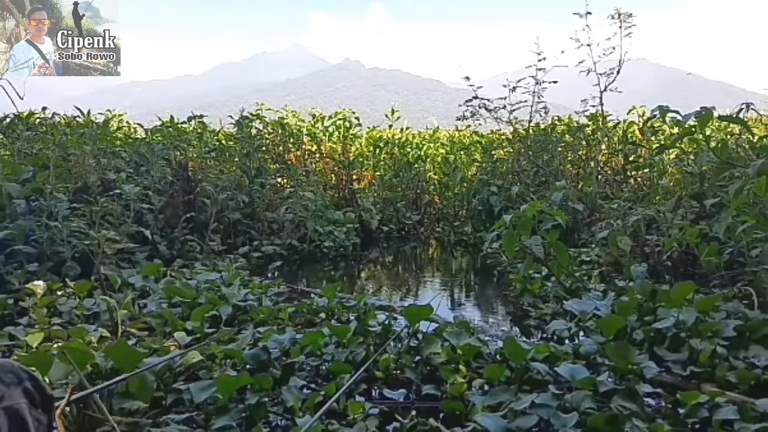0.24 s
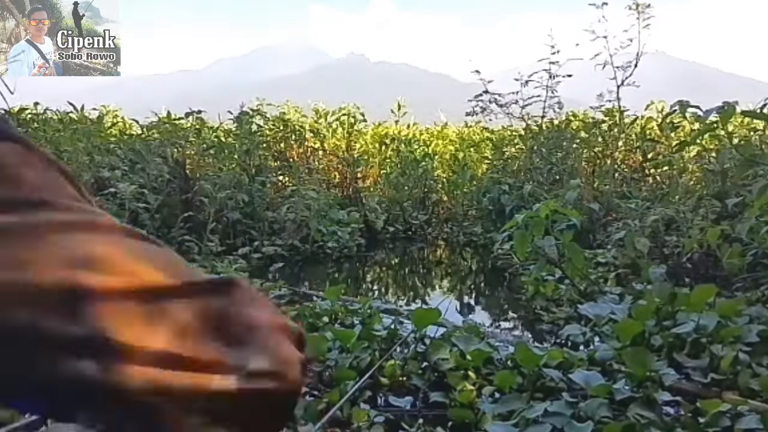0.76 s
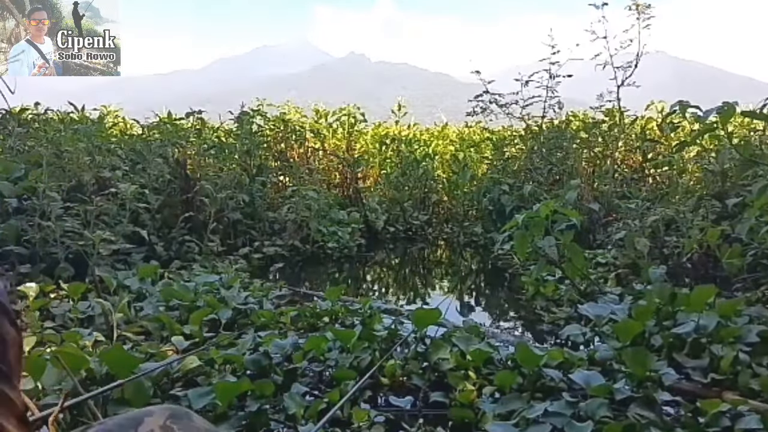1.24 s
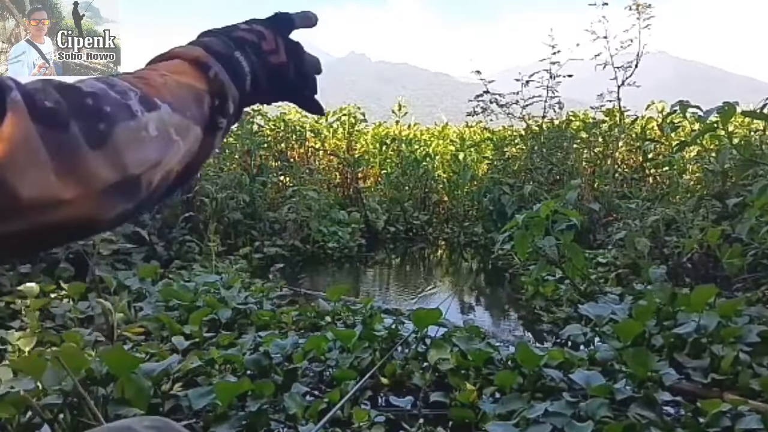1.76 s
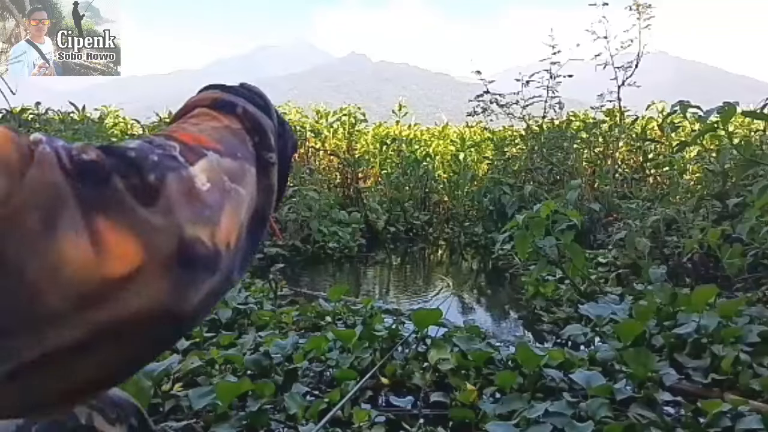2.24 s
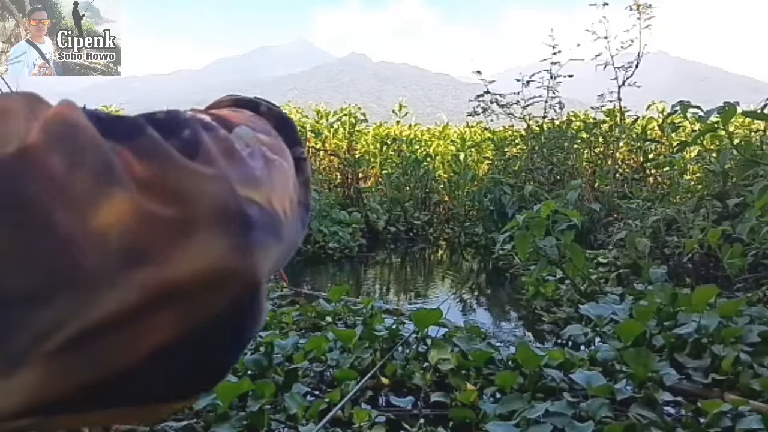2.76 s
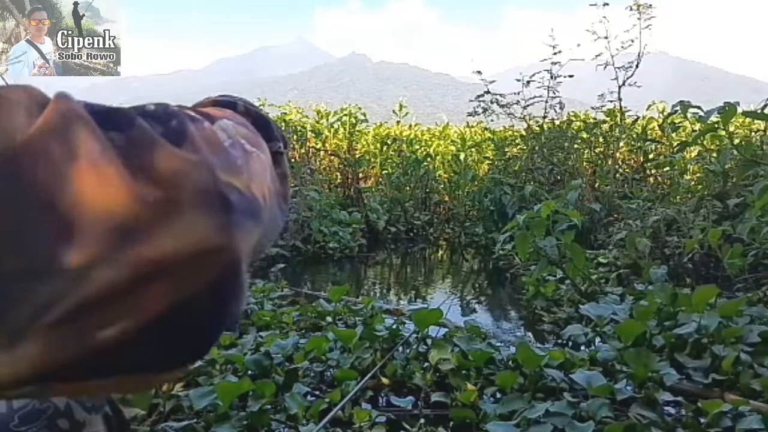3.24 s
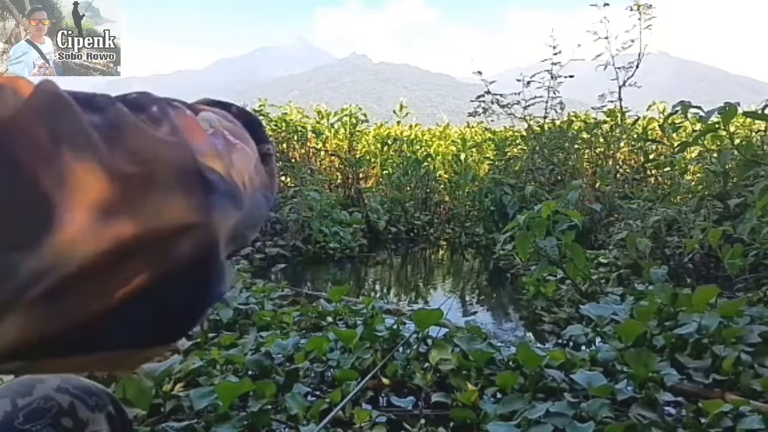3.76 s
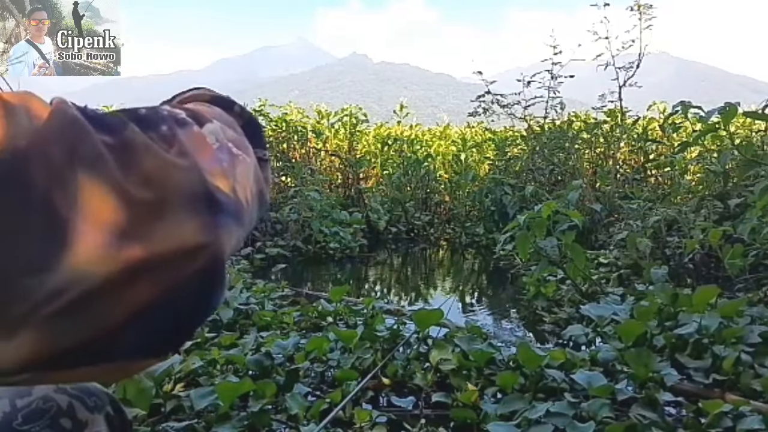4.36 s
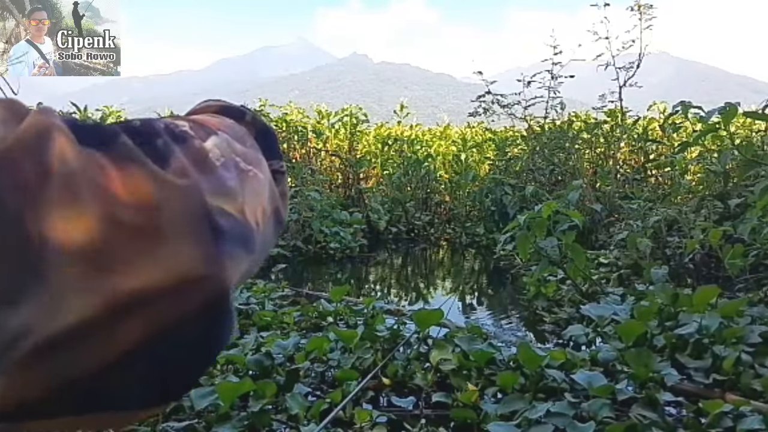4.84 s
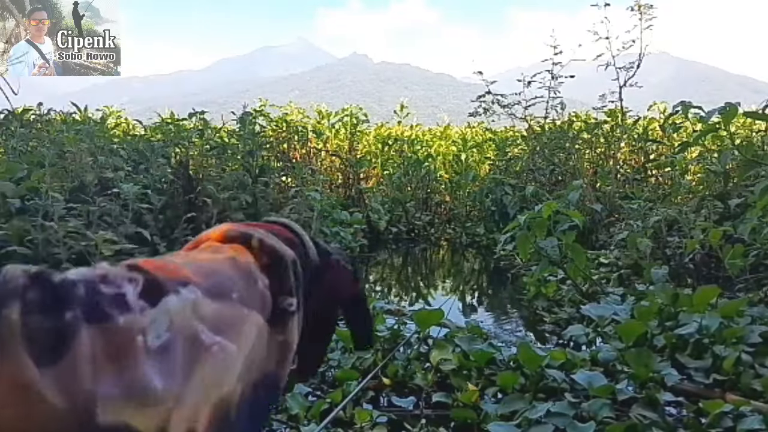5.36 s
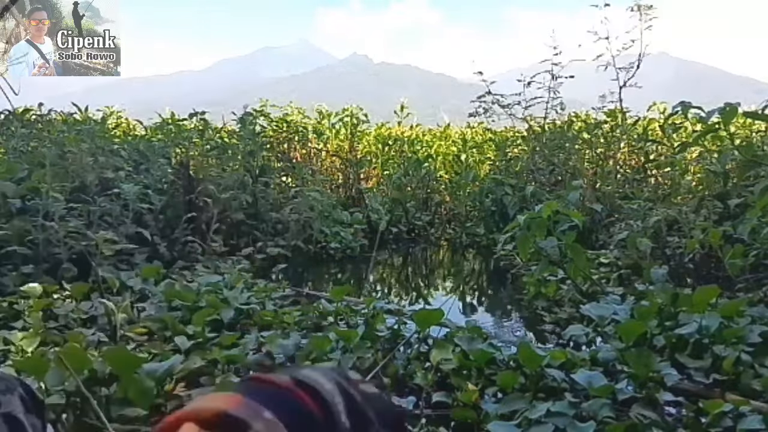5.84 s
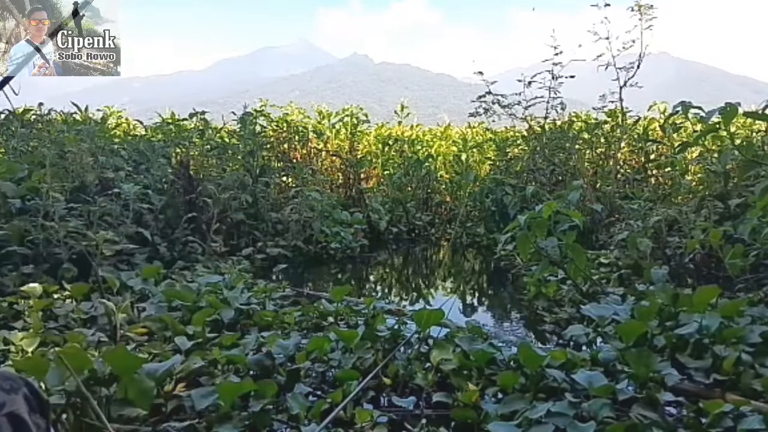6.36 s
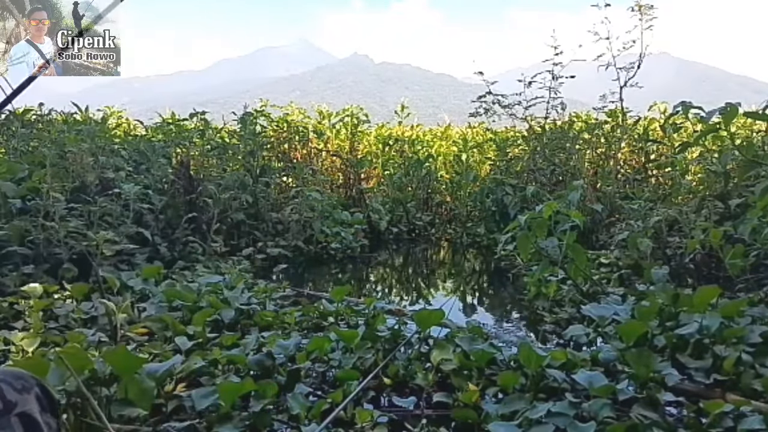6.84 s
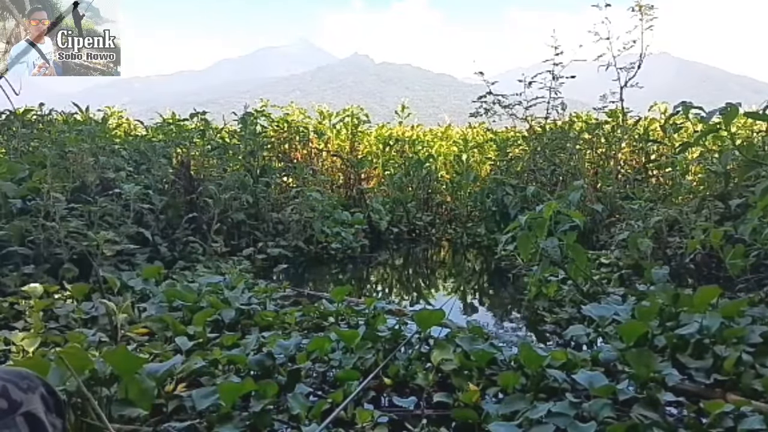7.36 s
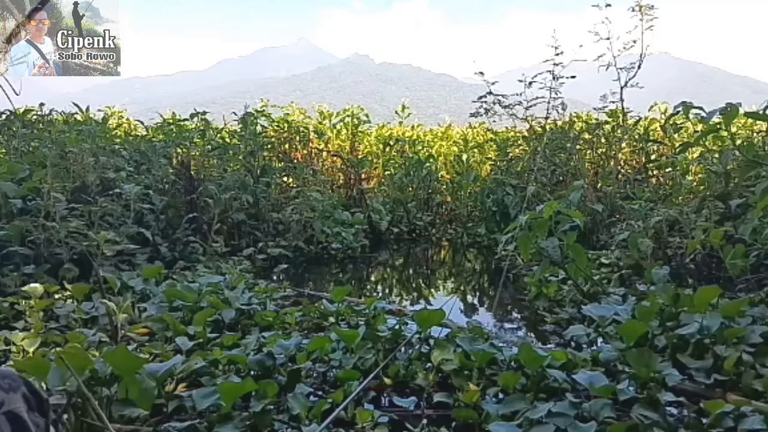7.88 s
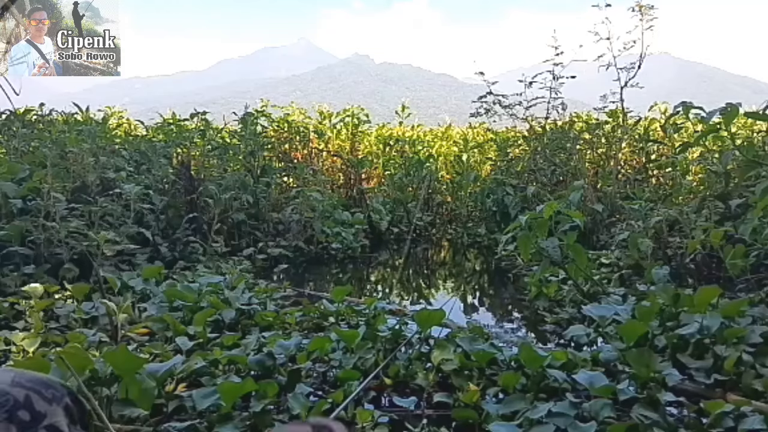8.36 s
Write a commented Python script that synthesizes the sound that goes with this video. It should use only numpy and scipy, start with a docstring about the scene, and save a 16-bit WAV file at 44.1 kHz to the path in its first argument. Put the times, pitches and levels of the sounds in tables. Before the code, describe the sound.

Throughout, a deep, uneven low rumble with a faint wavering hum lies under thin hiss and a dense, high, pulsing cicada chorus, wide and steady. At 0 s there is a soft puff and brush, with a light knock at 0.16. A distant bird whistles a quick falling note at 0.45, scattered by the trees. At 0.6 a bright metallic-sounding catch snaps close by, launching a gritty, hollow rod-on-hull scrape until 1.6; a second, louder falling whistle comes at 1.4. Gear knocks land at 2.0, 2.3, 2.5 and 2.8, the last with a cloth rub and a tiny rising squeak around 2.7. From 2.5 to the end another bird chirps roughly five times a second, short, hoarse and buzzy, strongest around 6.3. A dull knock falls at 5.0, small ones at 6.25 and 6.5, then a flurry of sharp clacks from 6.8 to 7.4 with faint brushes.

```python
"""A swamp by open water: cicadas, pulsed sines in a noise chorus, hiss over a deep heaving noise rumble. A bird
whistles twice (falling sines) and an insect chirps some five times a second in the reeds (pulsed rough rings).
Close by, an angler snaps a catch (noise puffs), drags a rod along a hull (slips exciting resonances), and
knocks (gear modes) and brushes (noise bands) against gear; something small squeaks once."""
import sys
import numpy as np
from scipy import signal
from scipy.fft import rfft, irfft
from scipy.io import wavfile
from scipy.ndimage import uniform_filter1d

SR = 44100
rng = np.random.default_rng(int(sys.argv[2]) if len(sys.argv) > 2 else 0)


def waveform_to_disk(signal):
    """Save audio, clipped to [-1, 1], as 16-bit WAV at the path in sys.argv[1]."""
    frames = np.transpose(np.atleast_2d(signal))
    scaled = np.clip(frames, -1, 1) * 32767
    samples = np.round(scaled).astype(np.int16)
    wavfile.write(sys.argv[1], SR, samples)


def makeup_ratio(level_db):
    """Linear amplitude ratio for a level in decibels (20 dB per factor of ten)."""
    decades = np.asarray(level_db, float) / 20
    return 10 ** decades


N = 379701


def at(points, x, column=1):
    """Reads one column of a table by straight lines."""
    table = np.transpose(points)
    return np.interp(x, table[0], table[column])


def colour(points, hz):
    """Reads a spectrum on a log frequency axis."""
    f, value = np.transpose(points)
    return np.interp(np.log(hz + 1), np.log(f + 1), value)


def evened(x):
    """Scales to rms 1."""
    return x / np.sqrt(np.mean(x ** 2) + 1e-20)


def drift(length, size):
    """Slow random wander of rms 1: noise averaged twice over size samples."""
    return evened(uniform_filter1d(uniform_filter1d(rng.standard_normal(length), size), size))


def bump(t, s, half):
    """A smooth swell of height 1 around time s."""
    return np.exp(-((t - s) / half) ** 2)


def sides(db):
    """Left and right gain for a left-right balance."""
    return makeup_ratio(np.array([[db / 2], [-db / 2]]))


def add(mix, s, sound):
    """Mixes a two-channel sound in at time s."""
    part = mix[:, round(s * SR):][:, :sound.shape[1]]
    part += sound[:, :part.shape[1]]


def resonate(x, hz, width):
    """Two-pole resonance of peak gain 1."""
    return signal.lfilter(*signal.iirpeak(np.clip(hz, 50, 20000), hz / width, SR), x)


# left-right likeness of diffuse noise: freq_hz, correlation
SAME = [(60, 0.98), (120, 0.97), (240, 0.77), (480, 0.31), (950, 0), (1890, 0.15), (3770, 0), (7520, -0.0),
        (15000, 0.0)]


def noise(spectrum, patchy_db, size):
    """Diffuse noise from random short-time spectra with drifting patches; alike at both ports in the bass."""
    frames = 4 * N // size + 5
    hz = np.fft.rfftfreq(size, 1 / SR)
    a, b, c, d, patches = rng.standard_normal((frames, len(hz), 5)).T
    patches = evened(uniform_filter1d(uniform_filter1d(patches, size=12, axis=0), size=12, axis=1))
    same = np.clip(colour(SAME, hz), -1, 1)[:, None]
    left = a + 1j * b
    right = same * left + np.sqrt(1 - same ** 2) * (c + 1j * d)
    z = np.array([left, right]) * makeup_ratio(colour(spectrum, hz)[:, None] + patchy_db * patches)
    return evened(signal.istft(z, nperseg=size, noverlap=size * 3 // 4)[1][:, :N])


def reeds(x, t60, wet_db, build, dry_db=0):
    """Scatter among reeds and water: sparse taps that build up and die, other taps per port."""
    t = np.arange(SR // 2) / SR
    taps = rng.standard_normal((2, len(t))) * (rng.random((2, len(t))) < .1)
    taps *= makeup_ratio(-60 * t / t60) * (1 - np.exp(-t / build))
    wet = signal.fftconvolve(x, taps / np.linalg.norm(taps[0]), axes=1)[:, :N]
    return makeup_ratio(dry_db) * x + makeup_ratio(wet_db) * wet


# deep noise spectrum: freq_hz, density_db
RUMBLE = [(12, -61), (20, -51), (27, -39), (29, -59.5), (41, -8.5), (70, 3), (103, -4.5), (129, -5),
          (161, -11), (193, -12.5), (342, -29), (511, -48), (800, -50.5), (1040, -63), (1760, -120)]
# rumble level course: time_s, level_db
RUMBLE_LEVEL = [(0, -23.5), (1.2, -22), (2, -24), (2.9, -24.5), (3.6, -21), (4.2, -25.5), (5.7, -22.5),
                (6.6, -24), (7.4, -21.5), (8.6, -23.5)]
# swells of the tone: time_s, pitch_hz, level_db, half_length_s
HUM_SWELLS = [(1.748, 193.2, -32.5, 0.28), (4.83, 186, -27, 0.23), (5.65, 184.9, -31.5, 0.28),
              (6.285, 193.2, -29, 0.22)]
# hiss of leaves and microphone: freq_hz, density_db
HISS = [(300, 7), (700, -4), (1500, -6), (3000, -7), (5000, -13), (5900, -16), (9000, -49.5), (10500, -14),
        (13000, -8.5), (15500, -9.5)]
HISS_DB, GUST_DB = -48, 0.95
HUM_HZ, HUM_DB, HUM_WANDER_HZ, HUM_WAVER_DB = 188.7, -41, 5.6, 3


def rumble(t):
    """Deep randomly heaving noise with a faint wavering tone, over the hiss of leaves and microphone."""
    turns = np.cumsum(HUM_HZ + HUM_WANDER_HZ * drift(N, size=9000)) / SR
    hum = makeup_ratio(HUM_DB + HUM_WAVER_DB * drift(N, size=6000)) * np.sin(2 * np.pi * turns)
    flutter = np.cumsum(3 * drift(N, size=3000)) / SR
    for s, hz, db, half in HUM_SWELLS:
        hum += makeup_ratio(db) * bump(t, s, half) * np.sin(2 * np.pi * (hz * t + flutter))
    level_db = at(RUMBLE_LEVEL, t) + GUST_DB * drift(N, size=2500)
    deep = makeup_ratio(level_db) * noise(RUMBLE, 0.84, size=4096)
    return deep + hum + makeup_ratio(HISS_DB) * noise(HISS, 1.66, size=512)


# nearest cicadas: ring_hz, pulses_per_s, wander_hz, level_db re chorus level, left_right_db
SINGERS = [(6436, 70, 22, -11, 1), (6655, 92, 24, -11, 2), (6712, 289, 16, -12, 1), (6995, 146, 25, -17, 1),
           (7220, 92, 140, -15, 1), (7530, 92, 30, -17, 1)]
# the many far cicadas: freq_hz, density_db
CHORUS = [(5600, -66), (6050, -47), (6200, -10.5), (6330, -4.5), (6400, -4.5), (6560, -0.5), (6700, 0),
          (6860, -1.5), (7150, 6), (7450, -4), (7700, -1.5), (8800, -17.5), (9800, -24.5), (12000, -56)]
# chorus level course: time_s, level_db
CHORUS_LEVEL = [(0.0, -41), (0.5, -40), (0.67, -43), (1.34, -40), (2.27, -42.5), (2.75, -41.5),
                (3.14, -40.5), (4.26, -42.5), (5.27, -41), (6.01, -39), (6.52, -40), (7.4, -40),
                (7.57, -41.5), (8.6, -41)]


def cicadas(t):
    """Near singers are a body ring under steady decaying pulses; far ones blend into a hiss."""
    near = np.zeros((2, N))
    for hz, per_s, wander_hz, db, pan_db in SINGERS:
        ring = np.sin(2 * np.pi * np.cumsum(hz + wander_hz * drift(N, size=600)) / SR)
        beat = np.cumsum(per_s * (1 + 0.024 * drift(N, size=8000))) / SR % 1
        pulsed = evened(ring * np.exp(-beat / 1.06))
        near += sides(pan_db) * makeup_ratio(db + 2.0 * drift(N, size=12000)) * pulsed
    far = noise(CHORUS, 1.3, size=1024)
    return makeup_ratio(at(CHORUS_LEVEL, t)) * (makeup_ratio(2.0) * far + reeds(near, 0.24, 0.38, 0.017))


# one falling whistle: time_s, pitch_hz, level_db
WHISTLE = [(0, 4700, -27), (0.031, 4874, -8), (0.041, 4500, 3), (.052, 3900, 6.5), (.07, 3200, 4.5),
           (.086, 2717, 0.5), (.135, 2620, -4.5), (0.179, 2670, -5.5), (.195, 2620, -46)]
WHISTLE_OCTAVE_DB, WHISTLE_ROUGH_HZ = -18.5, 130


def whistle(ending_db):
    """A near sine on a falling contour, grainy by pitch flutter, with a weak octave."""
    t = np.arange(0, WHISTLE[-1][0], 1 / SR)
    turns = np.cumsum(at(WHISTLE, t) + WHISTLE_ROUGH_HZ * drift(len(t), size=40)) / SR
    tone = np.sin(2 * np.pi * turns) + makeup_ratio(WHISTLE_OCTAVE_DB) * np.sin(4 * np.pi * turns)
    level_db = at(WHISTLE, t, column=2) + ending_db * np.clip(t / .08 - 1, 0, 1)
    return makeup_ratio(level_db) * tone * signal.windows.tukey(len(t), .05)


# whistle calls: start_s, level_db, held_ending_extra_db
WHISTLES = [(0.453, -43, 5), (1.394, -34.5, -2)]


def whistles():
    """A far whistling bird, strongly scattered; a distant tree line returns each call."""
    out = np.zeros((2, N))
    for s, db, ending_db in WHISTLES:
        call = makeup_ratio(db) * whistle(ending_db) * sides(0.65)
        add(out, s, call)
        add(out, s + .15, makeup_ratio(-13) * call)
    return reeds(out, 0.42, 8.7, 0.0046, dry_db=-2.0)


# one chirp: time_s, ring_hz, ring_db, hoarse_lower_skirt_db
CHIRP = [(-.009, 4170, -14, -40), (.004, 4360, -8, -32), (0.021, 4426, -1, -9.5), (.035, 4320, -13, -11.5),
         (.06, 4360, -9.5, -13.5), (.085, 4290, -18.5, -22.5), (0.123, 4477, -35, -32)]
CHIRP_PULSES_PER_S, CHIRP_ROUGH_HZ = 86.3, 115


def chirp(hoarse_db):
    """Quick uneven pulses of a rough ring; each pulse carries a hoarse noise puff around and below the ring."""
    t = np.arange(CHIRP[0][0], CHIRP[-1][0], 1 / SR)
    beat = np.cumsum(CHIRP_PULSES_PER_S * (1 + 0.23 * drift(len(t), size=500))) / SR + rng.random()
    pulse = 0.38 + np.sin(np.pi * beat) ** 2
    pitch_hz = at(CHIRP, t) * rng.normal(1, 0.00497) + CHIRP_ROUGH_HZ * drift(len(t), size=60)
    ring = np.sin(2 * np.pi * np.cumsum(pitch_hz) / SR)
    band = signal.butter(5, [2200, 4450], "band", fs=SR, output="sos")
    hoarse = evened(signal.sosfilt(band, resonate(rng.standard_normal(len(t)), 4570, 1600)))
    ring_gain = makeup_ratio(at(CHIRP, t, column=2))
    hoarse_gain = makeup_ratio(at(CHIRP, t, column=3) + hoarse_db)
    return (ring_gain * ring + hoarse_gain * hoarse) * pulse


# small rising squeak: start_s, length_s, from_hz, to_hz
SQUEAK = (2.72, .17, 1180, 1750)
SQUEAK_DB = -49


def squeak():
    """A rough tone that slides upward, swells and fades; returns start and sound."""
    s, length, from_hz, to_hz = SQUEAK
    u = np.arange(0, length, 1 / SR) / length
    turns = np.cumsum(from_hz + (to_hz - from_hz) * u + 90 * drift(len(u), size=60)) / SR
    return s, makeup_ratio(SQUEAK_DB) * np.sin(np.pi * u) ** 2 * np.sin(2 * np.pi * turns) * sides(0.5)


# chirp calls: time_s, level_db
CHIRPS = [(2.5022, -38.5), (2.695, -41), (2.9063, -40.5), (3.128, -41.5), (3.3424, -41.5), (3.5474, -40.5),
          (3.773, -40.5), (4.011, -41.5), (4.2777, -42), (4.4897, -41.5), (4.6868, -39), (4.8783, -39.5),
          (5.063, -39), (5.257, -38.5), (5.4472, -39.5), (5.68, -40.5), (5.877, -39), (6.0687, -38.5),
          (6.2572, -36.5), (6.452, -36), (6.6518, -38.5), (6.8637, -38), (7.058, -38.5), (7.259, -37.5),
          (7.468, -38.5), (7.7069, -41.5), (7.914, -39), (8.1433, -39), (8.353, -40), (8.5803, -42)]
HOARSE_DB, HOARSE_DB_PER_DB, USUAL_CHIRP_DB, CHIRP_SWAY_DB = -1.5, .3, -41.5, 1


def chirps_and_squeak():
    """Chirps, hoarser when louder and swaying a little in place, and the squeak, scattered by the reeds."""
    out = np.zeros((2, N))
    for (s, db), sway in zip(CHIRPS, rng.standard_normal(len(CHIRPS))):
        hoarse_db = HOARSE_DB + HOARSE_DB_PER_DB * (db - USUAL_CHIRP_DB)
        add(out, s + CHIRP[0][0], makeup_ratio(db) * chirp(hoarse_db) * sides(CHIRP_SWAY_DB * sway))
    add(out, *squeak())
    return reeds(out, 0.31, 0.53, 0.00082, dry_db=-2.0)


NEAR_LAG_SAMPLES = 9


def nearby(x):
    """A source close on the left reaches the right port late."""
    return np.array([x[0], np.roll(x[1], NEAR_LAG_SAMPLES)])


# hull resonances under the rubbing: freq_hz, width_hz, level_db
HULL = [(163, 14, 17.5), (105, 17, 15), (426, 23, 5.5), (932, 44, 1.5), (2620, 120, -11), (3900, 140, -11)]
# rubbing spectrum: freq_hz, density_db
DRAG_COLOUR = [(59, -8), (100, -2), (176, -2), (367, -19), (425, -20), (797, -23.5), (942, -16.5),
               (1160, -26.5), (3760, -30.5), (5960, -43.5), (6760, -37.5), (10500, -51.5), (15000, -63)]
# changes of press and rasp along the stroke: time_s, half_length_s, press_change_db, rasp_change_db
STROKE_CHANGES = [(0.634, 0.014, 15.5, 5.5), (0.768, 0.018, 3, -2), (0.883, 0.026, 4.5, 2),
                  (1.015, 0.044, 1, 5.5), (1.165, 0.041, 2, 2.5), (1.353, 0.073, 1, 5),
                  (1.46, .03, -2.5, 2)]
DRAG_START_S, DRAG_FULL_S, DRAG_STOP_S = .63, 0.805, 1.595
DRAG_START_DB, DRAG_DB, RASP_DB = -56.5, -38.5, 13


def drag(t):
    """Dense uneven slips excite the hull under a stroke of changing press and rasp that stops short."""
    press_db = np.interp(t, [DRAG_START_S, DRAG_FULL_S], [DRAG_START_DB, DRAG_DB])
    press_db = press_db + sum(db * bump(t, s, half) for s, half, db, _ in STROKE_CHANGES)
    rasp_db = RASP_DB + sum(db * bump(t, s, half) for s, half, _, db in STROKE_CHANGES)
    moving = np.clip(np.minimum(t - DRAG_START_S + 0.021, DRAG_STOP_S - t) / 0.0062, 0, 1)
    stroke = makeup_ratio(press_db + 1.46 * drift(N, size=120)) * moving
    grit = noise([(20, 0), (20000, 0)], 1.5, size=256)
    catches = rng.standard_normal(N) * makeup_ratio(3.34 * np.minimum(rng.exponential(1, N), 6))
    slips = stroke * nearby(grit + 0.62 * evened(catches))
    ring = sum(makeup_ratio(db) * resonate(slips, hz, width) for hz, width, db in HULL)
    hz = np.fft.rfftfreq(N, 1 / SR)
    coloured = rfft(slips) * makeup_ratio(colour(DRAG_COLOUR, hz) - colour(DRAG_COLOUR, 1340))
    upper = 1 / (1 + (1400 / (hz + 1)) ** 6)
    rasp = makeup_ratio(rasp_db) * irfft(coloured * upper, N)
    body = makeup_ratio(9.5) * irfft(coloured * (1 - upper), N)
    return body + rasp + makeup_ratio(11.5) * ring


# gear modes: freq_hz, t60_s
GEAR = [(650, 0.027), (1000, 0.0085), (1350, 0.015), (1700, 0.012), (2050, 0.037), (2400, 0.02),
        (3000, 0.0083), (3550, 0.018)]
CRACK_DB, CRACK_DB_PER_OCTAVE = -14.5, 8.5  # crack before its filter, for a blow centred at 1 kHz


def knock(t, hz, octaves, lag):
    """A short crack, stronger for higher blows, and the gear modes near the centre of the blow."""
    crack_db = CRACK_DB + CRACK_DB_PER_OCTAVE * np.log2(hz / 1000)
    crack = makeup_ratio(crack_db) * rng.standard_normal(len(t)) * np.exp(-t / 0.002)
    ring = np.zeros(len(t))
    for f, t60 in GEAR:
        share = np.exp(-(np.log2(f / hz) / octaves) ** 2)
        ring += share * makeup_ratio(-60 * t / t60) * np.sin(2 * np.pi * f * t)
    sound = ring / abs(ring).max() + resonate(resonate(crack, 2200, 5500), 2200, 10000)
    return np.array([sound, np.roll(sound, round(lag))]) * sides(0.88)


def puff(t, hz, width, rise, t60):
    """A band of noise, filtered twice, that rises and dies."""
    own, shared = rng.standard_normal((2, len(t))), rng.standard_normal(len(t))
    band = nearby(resonate(resonate(own + 0.43 * shared, hz, width), hz, width))
    return evened(band) * np.minimum(t / rise, 1) * makeup_ratio(-60 * np.maximum(t - rise, 0) / t60)


# knocks on the gear: start_s, level_db, centre_hz, spread_octaves, right_lag_samples
KNOCKS = [(.16, -28.5, 1500, 0.63, 5), (.679, -25, 1400, .15, -8.5), (2.005, -26, 1520, 1, 6.5),
          (2.273, -26, 1500, 1.6, 5.5), (2.511, -35, 1200, 0.66, 8), (2.788, -29.5, 1100, 1.3, 4),
          (5.032, -32, 680, 0.42, 7), (6.254, -40, 650, 0.51, 9), (6.506, -36, 910, 0.97, -1),
          (6.799, -33, 1710, 0.16, 2), (6.963, -16, 2400, 0.17, -1), (7.019, -33, 700, .6, 7),
          (7.046, -19, 1280, 0.5, 9), (7.166, -19, 2840, 0.37, 1.5), (7.365, -30, 910, 0.72, -3)]
# catch snap (rush, tick, bright crack, its hiss): start_s, level_db, centre_hz, width_hz, rise_s, t60_s
SNAP = [(.611, -21, 9000, 12200, 0.0078, 0.12), (0.616, -16.5, 6360, 2500, 0.0008, 0.0076),
        (.619, -9, 12600, 7000, 0.00039, 0.0051), (.622, -40, 12500, 8000, .006, 0.1)]
# sudden noise puffs, some the tails of knocks: start_s, level_db, centre_hz, width_hz, t60_s
PUFFS = [(0, -30.5, 12400, 1800, 0.16), (0, -38, 4000, 9350, 0.73), (6.962, -36.5, 2750, 3020, 0.27),
         (7.167, -42.5, 2810, 2500, 0.53)]
# brushes of cloth and line that swell first: start_s, level_db, centre_hz, width_hz, t60_s
RUBS = [(0, -41.5, 880, 340, 0.37), (.16, -50.5, 2150, 600, 0.34), (2.77, -42.5, 1560, 600, 0.18),
        (7.2, -44, 13600, 4000, 0.14), (7.42, -50, 13400, 5000, 0.13)]
PUFF_RISE_S, RUB_RISE_SHARE_OF_T60 = 0.0032, 0.25


def handling():
    """Knocks on gear; the snap, sudden puffs and brushes as bands of noise; a little nearby scatter."""
    out = np.zeros((2, N))
    t = np.arange(SR // 2) / SR
    for s, db, hz, octaves, lag in KNOCKS:
        add(out, s, makeup_ratio(db) * knock(t, hz, octaves, lag))
    for s, db, hz, width, rise, t60 in SNAP:
        add(out, s, makeup_ratio(db) * puff(t, hz, width, rise, t60))
    for s, db, hz, width, t60 in PUFFS:
        add(out, s, makeup_ratio(db) * puff(t, hz, width, PUFF_RISE_S, t60))
    for s, db, hz, width, t60 in RUBS:
        add(out, s, makeup_ratio(db) * puff(t, hz, width, RUB_RISE_SHARE_OF_T60 * t60, t60))
    return reeds(out, .14, -10, .003)


def scene():
    """All sources at the two ports, the left a little louder."""
    t = np.arange(N) / SR
    sources = cicadas(t) + whistles() + chirps_and_squeak() + drag(t) + handling()
    return rumble(t) * sides(0.86) + sources * sides(1.2)


def band_limit(x):
    """A steep low-pass at the top of the band."""
    return signal.sosfilt(signal.butter(12, 15800, fs=SR, output="sos"), x)


def record(dry):
    """The microphone cuts the deepest bass, below 40 Hz."""
    mix = signal.sosfilt(signal.butter(6, 40, "high", fs=SR, output="sos"), dry)
    return band_limit(mix)


dry = scene()
out = record(dry)
waveform_to_disk(out)
```